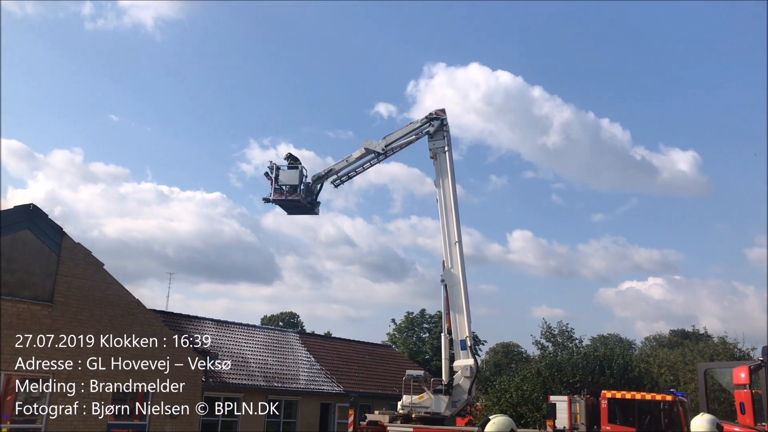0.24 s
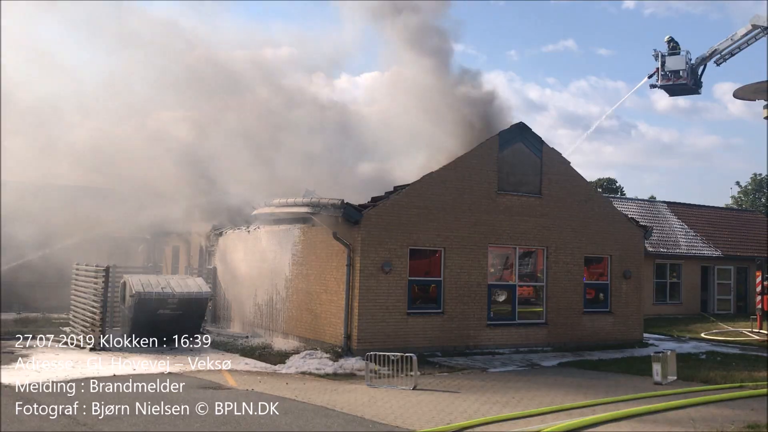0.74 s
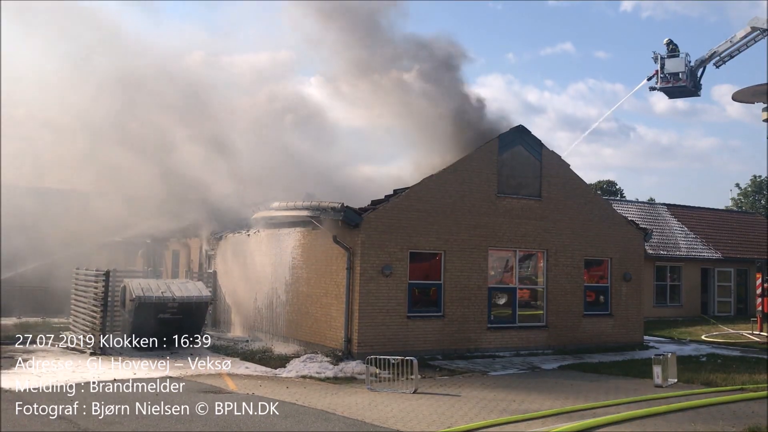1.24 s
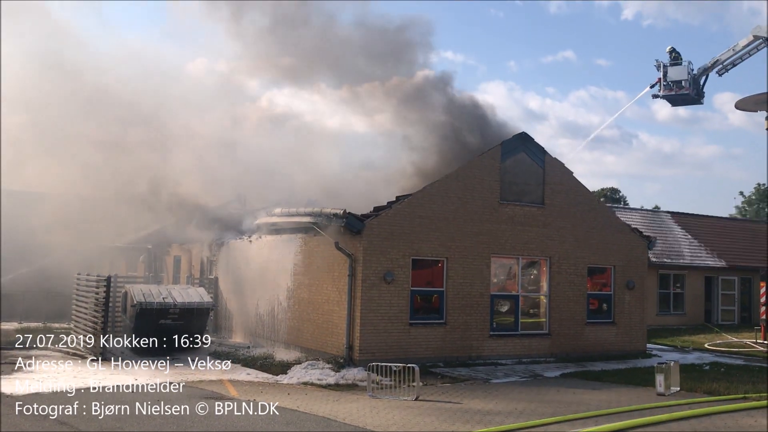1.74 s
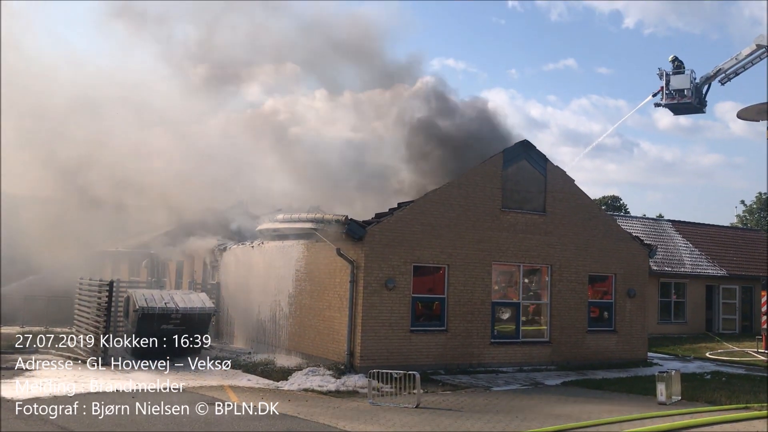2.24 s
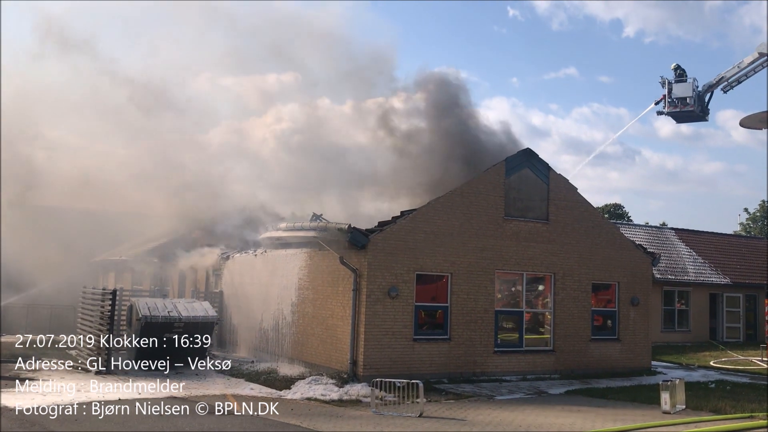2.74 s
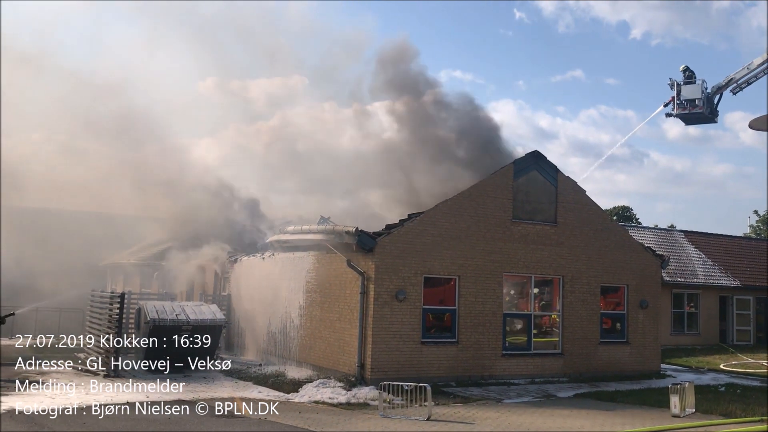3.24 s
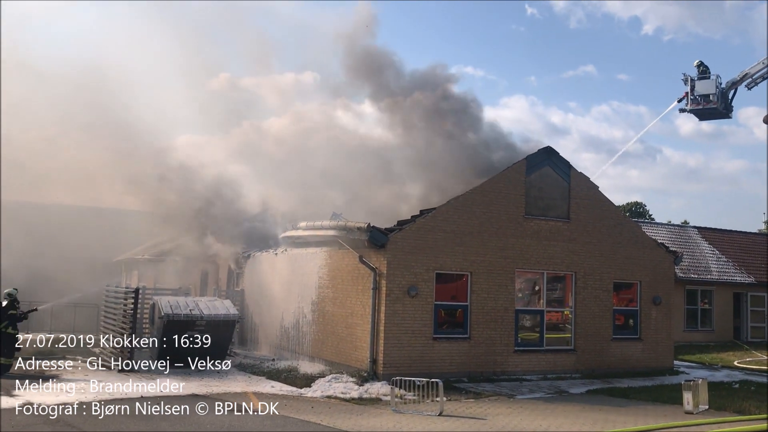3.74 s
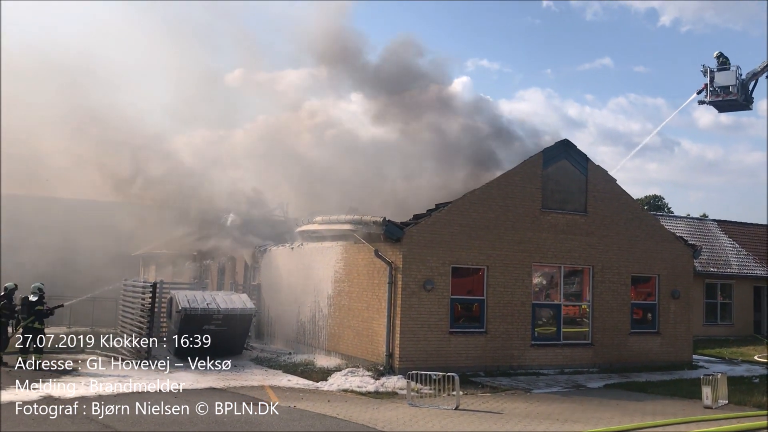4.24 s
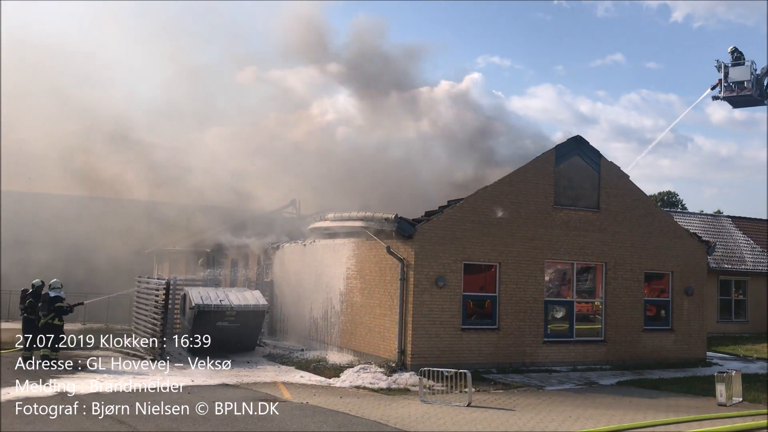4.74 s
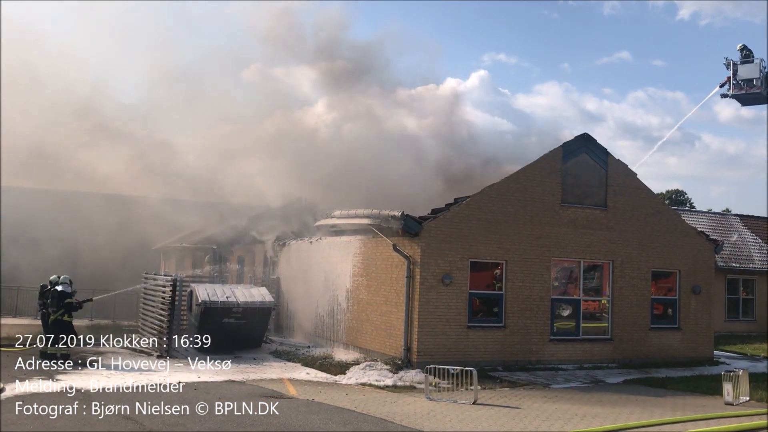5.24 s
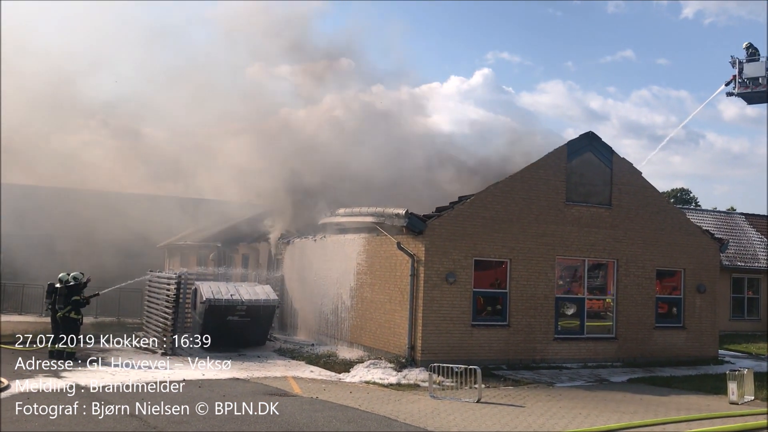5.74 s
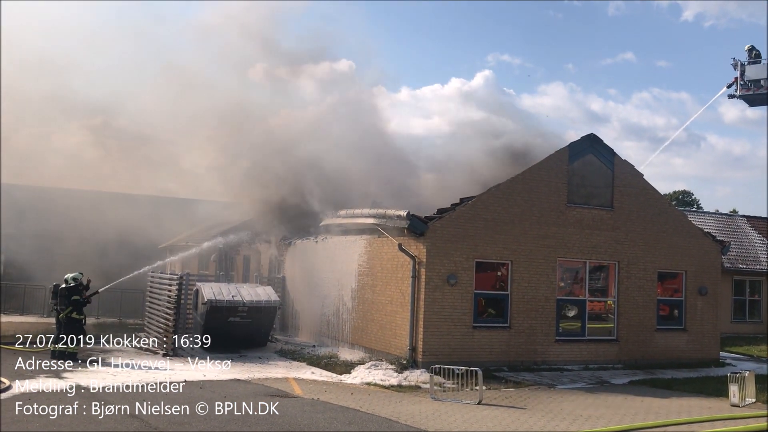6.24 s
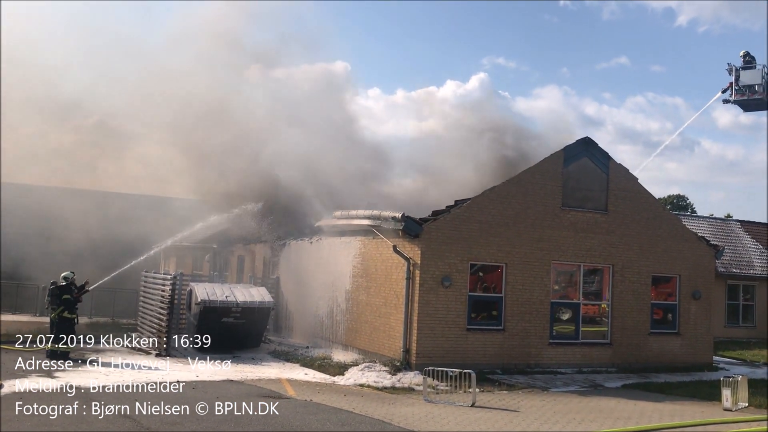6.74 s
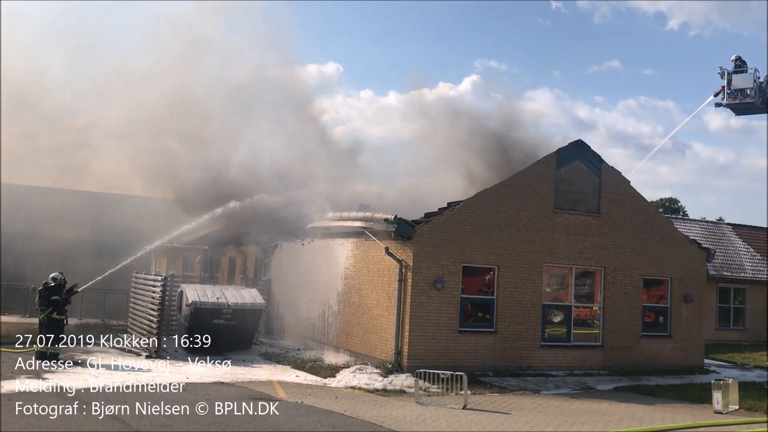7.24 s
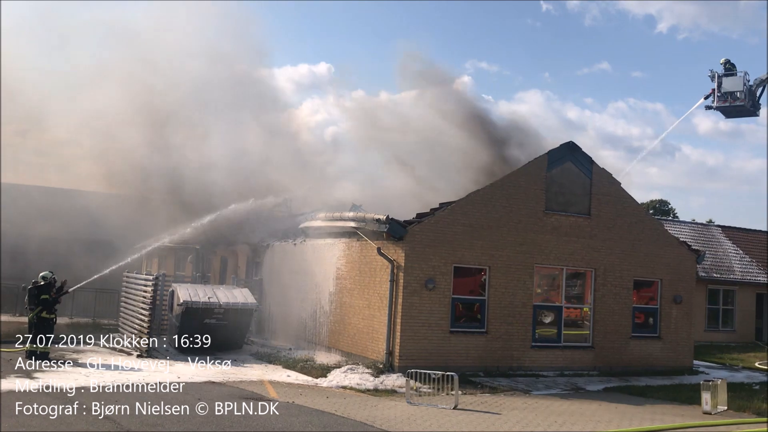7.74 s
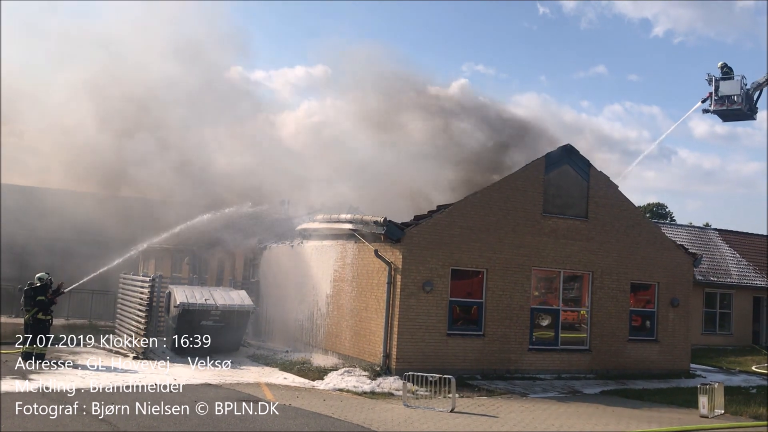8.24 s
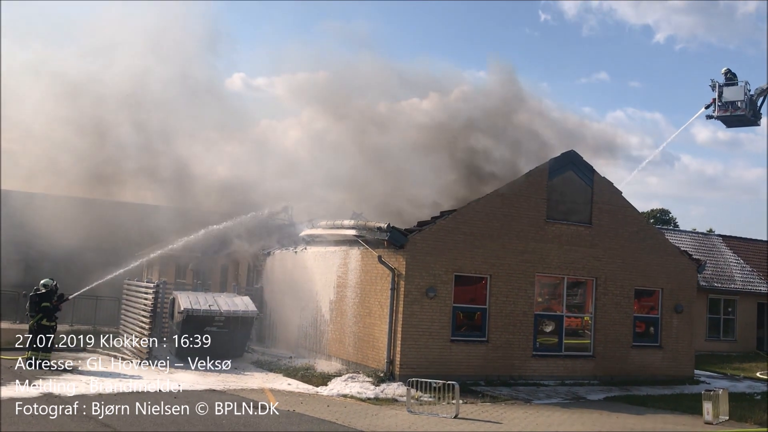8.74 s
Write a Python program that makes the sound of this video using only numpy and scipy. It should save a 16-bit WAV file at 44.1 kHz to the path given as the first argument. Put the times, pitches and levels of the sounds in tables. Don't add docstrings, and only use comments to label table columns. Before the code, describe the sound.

Outdoors at a building fire: constant spraying hiss, rattling fire engine, low rolling blaze roar and faint wind hum, briefly interrupted early on.

```python
import sys
import numpy as np
from scipy import signal
from scipy.fft import rfft, irfft, next_fast_len
from scipy.io import wavfile
from scipy.ndimage import uniform_filter1d, map_coordinates

SR = 44100
rng = np.random.default_rng(int(sys.argv[2]) if len(sys.argv) > 2 else 0)


def natural_amplitude(level_db):
    exponent = np.asarray(level_db, float) / 20
    return 10 ** exponent


def file_out(sig):
    cols = np.atleast_2d(sig).T
    lim = np.clip(cols, -1, 1)
    pcm = np.round(lim * 32767).astype(np.int16)
    wavfile.write(sys.argv[1], SR, pcm)


N = 396900
TIME = np.arange(N) / SR

# start_s, end_s
SILENCE_S = (.7118, .7618)
FIRST_VIEWPOINT = TIME < SILENCE_S[0]

# time_s, level_db, facing_db (more when the microphone points at the near jet)
JET_AIM = [(0, -31, 4), (.36, -32, 4), (.71, -33, 5), (.76, -28, 4), (1, -29.5, 4.5), (1.4, -28, 0.5),
           (1.7, -29.5, 2.5), (2.4, -27, 2), (3.15, -28.5, 3), (3.65, -28, 2), (4.1, -30, 0),
           (4.7, -29.5, -2), (5.4, -28, -3), (5.9, -29.5, -2), (6.6, -28, -1.4), (7, -28.5, .5),
           (7.8, -28.5, -1), (9, -29, -2)]
# freq_hz, density_db
JET_COLOUR = [(300, -29.5), (700, -13), (1100, -12), (1600, -9), (2200, -8), (3000, -9.5), (4500, -10),
              (6200, -12.5), (7200, -15.5), (7800, -20), (9300, -21.5), (10500, -29), (12500, -31.5),
              (15800, -46)]
# freq_hz, gain_db
FIRST_JET_TINT = [(1500, 2.5), (2900, -2.5), (4500, 0), (6500, 2), (8800, 7), (10500, -12), (15000, -4)]
# time_s, extra_path_ms
PAVING_BOUNCE = [(0, 0.27), (.25, .4), (.55, 0.6), (1, .612), (1.5, 0.64), (2, 0.66), (2.7, 0.69),
                 (3.2, 0.68), (4.2, 0.7), (5, 0.71), (5.8, 0.723), (6.15, 0.82), (7, 0.83), (7.5, .79),
                 (8.2, 0.783), (9, .76)]
# delay_ms, level_db
WALL_ECHOES = [(5.3, -16), (8.9, -17), (14.7, -19)]

CYLINDER_KNOCKS = [-3.5, 2, -0.5, -2, 2, 3]
# freq_hz, width_hz, level_db
BLOCK_RINGS = [(535, 160, 0), (946, 140, -1)]
# freq_hz, width_hz, level_db
PANEL_RINGS = [(409, 90, -8), (525, 143, -1), (901.6, 150, -3), (981.5, 125, -4)]
# freq_hz, width_hz, level_db
FAN_RINGS = [(628, 110, -0.5), (691.7, 78, 1.5)]

# time_s, level_db
ROAR_SWELLS = [(0, -30.5), (.5, -26), (.71, -29.5), (.9, -30.5), (1.2, -20), (1.55, -25), (2.1, -23.5),
               (2.85, -24.5), (3.3, -28.5), (3.46, -21), (3.9, -26), (4.4, -24), (5.05, -23.5), (5.4, -27),
               (5.6, -24), (6.3, -25.5), (7.6, -26), (8.2, -23.5)]
# freq_hz, density_db
ROAR_COLOUR = [(18, -37), (38, -15), (50, -5.5), (75, -2.5), (110, -2.5), (150, -4), (190, -9.5), (225, -9),
               (275, -15), (305, -13), (345, -21), (480, -20.5), (600, -42)]

# multiple_of_engine_cycle, rms_db
EXHAUST_ORDERS = [(6, -47.5), (12, -30.5), (18, -34), (30, -42)]
# pitch_hz, rms_db, share_of_load (0 to 1)
PUMP_TONES = [(268.4, -42.5, 1), (930.6, -49.5, .2), (2387, -57, 0)]
# time_s, load_db
PUMP_LOAD = [
    (0, -3),
    (3, -2),
    (5.5, 0),
    (5.9, 3),
    (8.3, 4),
    (8.6, 0),
    (9, 0),
]

# start_s, length_s, first_hz, last_hz, level_db
WIRE_GUSTS = [
    (0.799, 0.38, 208, 232, -30),
    (1.152, .77, 200.5, 234, -27.5),
    (1.899, 0.3, 233.4, 202.2, -29.5),
    (2.297, .32, 214, 228, -33),
    (3.854, .26, 209.6, 229, -33.5),
    (4.118, 0.42, 202.7, 227.7, -29.5),
    (4.653, .4, 205, 222, -30),
    (5.053, 0.24, 228, 217, -32.5),
    (5.65, .45, 222.5, 222.6, -36),
]
# pitch_hz, rms_db
IDLING_TRUCK = [(30, -36), (55.5, -37)]

# freq_hz, step_db over the local level
PHONE_STEP = [(300, -16), (3000, -6), (9000, -5), (13000, -2.5), (15000, 2.5)]
# time_s, treble_lost_above_hz
TREBLE_LOSSES = [(.074, 9500), (.565, 9000), (2.782, 8400), (4.276, 7400), (4.448, 7800), (5.045, 7800),
                 (5.364, 7800), (5.707, 7600), (5.835, 7400), (5.899, 7600), (6.112, 6500), (6.387, 8000),
                 (6.773, 8000), (7.114, 8450), (7.305, 7600), (8.138, 8600), (8.822, 7700)]


def level(x, db):
    return x * natural_amplitude(db) / np.sqrt(np.mean(x ** 2))


def curves(table):
    seconds, *columns = np.transpose(table)
    return [np.interp(TIME, seconds, column) for column in columns]


def walk(rate):
    hold_ms = int(1000 / rate)
    length_ms = int(N / SR * 1000)
    held = np.repeat(rng.standard_normal(length_ms // hold_ms + 2), hold_ms)
    slewed = uniform_filter1d(uniform_filter1d(held, hold_ms), hold_ms)
    return np.interp(TIME * 1000, np.arange(len(held)), 1.3 * slewed)


def sine(phase, rms_db):
    return np.sqrt(2) * natural_amplitude(rms_db) * np.sin(phase)


def ring(x, hz, width):
    return signal.lfilter(*signal.iirpeak(hz, hz / width, fs=SR), x)


def body(x, modes):
    return sum(natural_amplitude(db) * ring(ring(x, hz, width), hz, width) for hz, width, db in modes)


def bands(colour, count):
    size = next_fast_len(N)
    octave = np.log2(np.arange(size // 2 + 1) * SR / size + 1)
    hz, db = np.transpose(colour)
    shape_db = np.interp(octave, np.log2(hz), db, left=-90, right=-90)
    noise = rfft(rng.standard_normal(size)) * natural_amplitude(shape_db)
    centres = np.linspace(np.log2(hz[0]), np.log2(hz[-1]), count)
    spacing = centres[1] - centres[0]
    for centre in centres:
        share = np.clip(1 - np.abs(octave - centre) / spacing, 0, 1)
        yield 2 ** centre, irfft(noise * share, size)[:N]


def jets():
    db, facing_db = curves(JET_AIM)
    smoke_db = -5 * np.exp(-((TIME - 3.14) / 0.49) ** 2)
    body_db, bite_db, mist_db = 0 * db, 0.95 * facing_db, 1.38 * facing_db + smoke_db
    surge, spray = walk(7), 0
    for hz, band in bands(JET_COLOUR, count=16):
        tilt_db = mist_db if hz > 7500 else bite_db if hz > 3200 else body_db
        tint_db = np.interp(hz, *np.transpose(FIRST_JET_TINT)) * FIRST_VIEWPOINT
        spray = spray + band * natural_amplitude(tilt_db + tint_db + 0.62 * surge + 0.71 * walk(10.5))
    return level(spray + paving_bounce(spray), 4.4) * natural_amplitude(db)


def paving_bounce(spray):
    step_s, step_length_s, step_blur_db = 6, .12, -6
    steadying_db = np.interp(TIME, [1, 3.2], [-4, 0])
    db = np.select([FIRST_VIEWPOINT, TIME < step_s], [-12, -7 + steadying_db], -7)
    db = db + step_blur_db * np.exp(-((TIME - step_s) / step_length_s) ** 2)
    path_ms, = curves(PAVING_BOUNCE)
    late = np.arange(N) - (path_ms + 0.0044 * walk(4.3)) * SR / 1000
    bounce = map_coordinates(spray, [late], order=3, mode="nearest")
    bounce = np.convolve(bounce, [.12, .76, .12], "same") * natural_amplitude(1.2 * walk(4))
    return natural_amplitude(db) * bounce


def walls(x):
    here = np.arange(N)
    out = x
    for ms, db in WALL_ECHOES:
        late = here - ms * SR / 1000 - 5 * walk(2)
        out = out + natural_amplitude(db) * np.interp(late, here, x)
    return out


CYCLE_HZ = 4.9995


def diesel():
    facing_db = curves(JET_AIM)[1]
    clatter_db, fan_db = -30.5 + .2 * facing_db, -7 + .65 * facing_db
    cycles = np.arange(int(N / SR * CYCLE_HZ) + 1)[:, None] / CYCLE_HZ
    order = np.arange(6)
    firings = cycles + order / 6 / CYCLE_HZ + 0.001 * (order % 2)
    ticks = cycles + rng.random(20) / CYCLE_HZ
    when = np.hstack([firings, ticks])
    tick_db = -10.5 + 3 * rng.standard_normal(20)
    size = natural_amplitude(np.hstack([CYLINDER_KNOCKS, tick_db]) + 1.5 * rng.standard_normal(when.shape))
    place = (when + .00003 * rng.standard_normal(when.shape)) * SR
    knocks = np.bincount(place.astype(int).ravel().clip(0), size.ravel(), N)[:N]
    phase = TIME * CYCLE_HZ * 6 % 1
    loose = rng.standard_normal(N) * (1 + 0.53 * np.exp(-phase / 0.22))
    block = level(body(knocks, BLOCK_RINGS), -6.5)
    panels = level(body(loose, PANEL_RINGS), -3.0)
    fan = level(body(rng.standard_normal(N), FAN_RINGS), -0.87) * natural_amplitude(fan_db + 2.3 * walk(6))
    return (block + panels + fan) * natural_amplitude(clatter_db)


def roar():
    db, = curves(ROAR_SWELLS)
    swell_db = db - db.mean()
    follows = [1, 0.41, 0.092, 0]
    shade_db = [0, -4 * FIRST_VIEWPOINT, 2.5 * FIRST_VIEWPOINT, 0]
    roll, low = walk(8), 0
    for hz, band in bands(ROAR_COLOUR, count=11):
        part = int(hz > 115) + int(hz > 175) + int(hz > 330)
        band_db = follows[part] * swell_db + shade_db[part]
        low = low + band * natural_amplitude(band_db + .9 * roll + 1.2 * walk(9))
    return level(low, 1.3) * natural_amplitude(db.mean())


def exhaust_and_pump():
    air_db, load_db = curves(ROAR_SWELLS)[0], curves(PUMP_LOAD)[0]
    ride_db = .6 * (air_db - air_db.mean())
    lines = [(multiple * CYCLE_HZ, db + ride_db) for multiple, db in EXHAUST_ORDERS]
    lines += [(hz, db + share * load_db) for hz, db, share in PUMP_TONES]
    return sum(sine(2 * np.pi * hz * TIME + .5 * walk(4), db + 1.8 * walk(4)) for hz, db in lines)


def wire_hum():
    out = np.zeros(N)
    for start, length, first_hz, last_hz, db in WIRE_GUSTS:
        gone = (TIME - start) / length
        fade = np.clip(np.minimum(gone, 1 - gone) * length / 0.054, 0, 1)
        swell_db = np.interp(gone, [0, .65, 1], [-6, 0, -6])
        hz = np.interp(gone, [0, 1], [first_hz, last_hz]) + .8 * walk(12)
        out = out + fade * sine(2 * np.pi * np.cumsum(hz) / SR, db + swell_db)
    return out


def truck():
    return sum(sine(2 * np.pi * hz * TIME, db + 1.5 * walk(4)) for hz, db in IDLING_TRUCK)


def scene():
    water = natural_amplitude(-0.8) * walls(jets())
    engine = natural_amplitude(-0.74) * diesel() + exhaust_and_pump() * natural_amplitude(-4.5 * FIRST_VIEWPOINT)
    mix = water + engine + roar() + wire_hum() + truck() * FIRST_VIEWPOINT
    return mix[None]


def phone_grain(x):
    hop = 941
    window, lead = np.sqrt(signal.get_window("hann", 2 * hop)), int(.54 * hop)
    hz, s, z = signal.stft(np.pad(x[0], (lead, 0)), SR, window, 2 * hop, hop)
    power = uniform_filter1d(np.abs(z) ** 2, size=61, axis=0)
    local = np.sqrt(uniform_filter1d(power, size=5, axis=1))
    chance = np.repeat(rng.random((len(hz) // 10 + 1, len(s))), 10, axis=0)[:len(hz)]
    step_db = np.interp(hz, *np.transpose(PHONE_STEP))[:, None] + 5.5 * (chance - .5)
    step = local * natural_amplitude(step_db) + 1e-12
    size = np.abs(z)
    z = z / (size + 1e-12) * step * np.floor(size / step + .45)
    spell = uniform_filter1d(chance - .5, size=4, axis=1)
    z *= spell < np.interp(hz, [10000, 13000, 15000, 15700], [.42, .3, .25, .1])[:, None]
    for t, edge_hz in TREBLE_LOSSES:
        k = np.argmin(np.abs(s - lead / SR - t))
        kept = chance[:, k] > np.where(hz > edge_hz, .92, .3)
        z[:, k] *= np.where(hz > 1500, .12 + kept * 1.15, 1)
    return signal.istft(z, SR, window, 2 * hop, hop)[1][None, lead:lead + N]


def top_cut(x):
    return signal.sosfilt(signal.butter(12, 15700, fs=SR, output="sos"), x)


def record(dry):
    sounding = FIRST_VIEWPOINT | (TIME > SILENCE_S[1])
    mix = phone_grain(dry) * sounding
    return top_cut(mix)


dry = scene()
out = record(dry)
file_out(out)
```